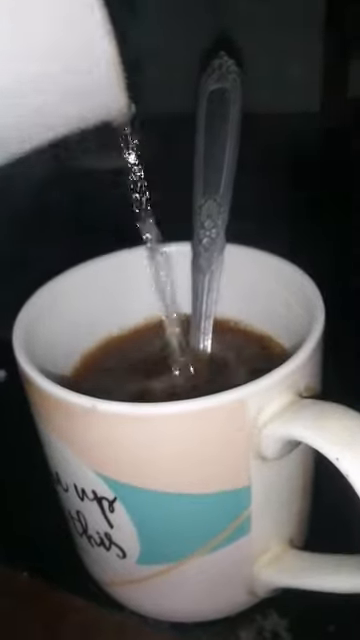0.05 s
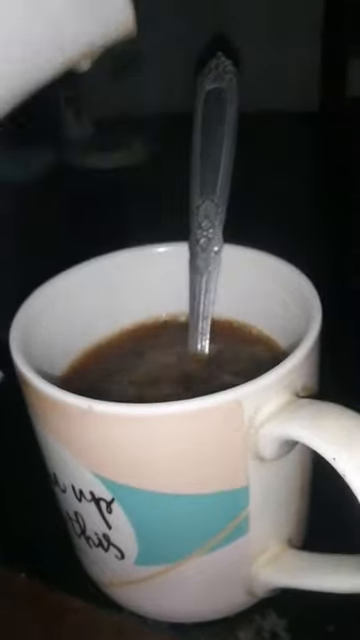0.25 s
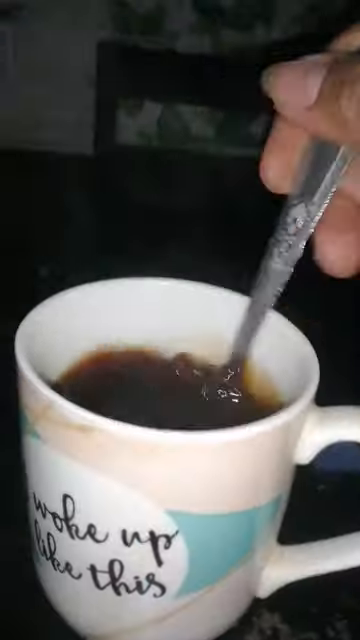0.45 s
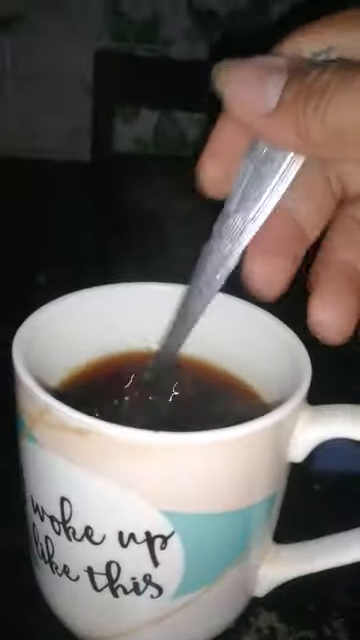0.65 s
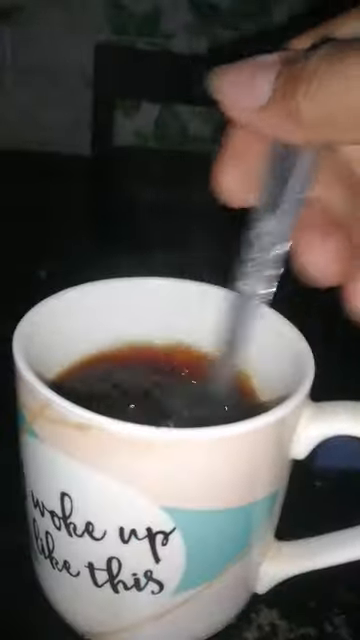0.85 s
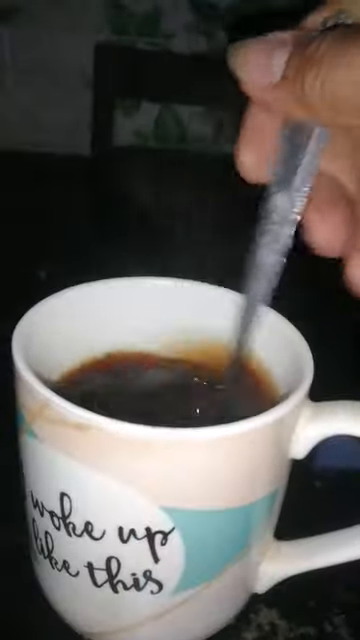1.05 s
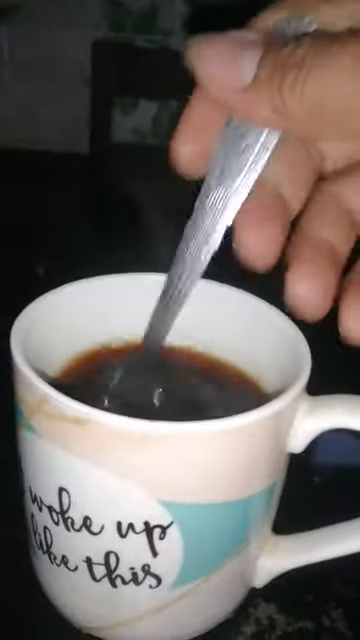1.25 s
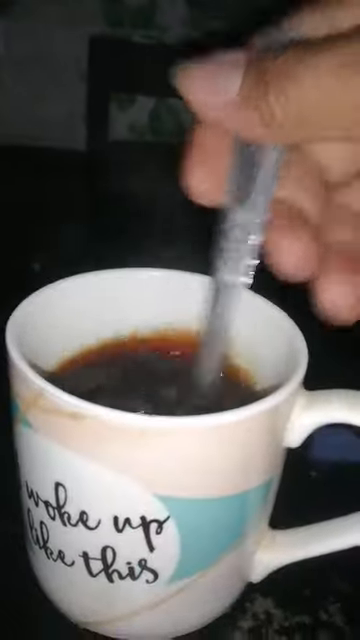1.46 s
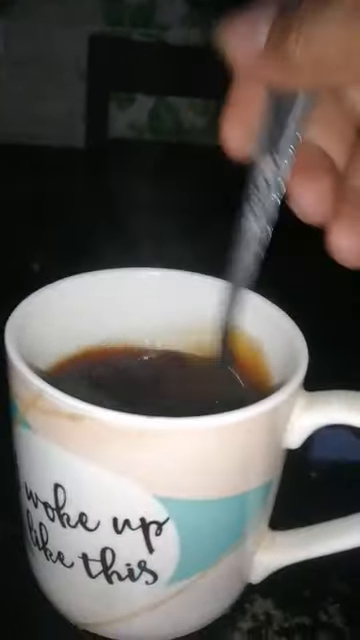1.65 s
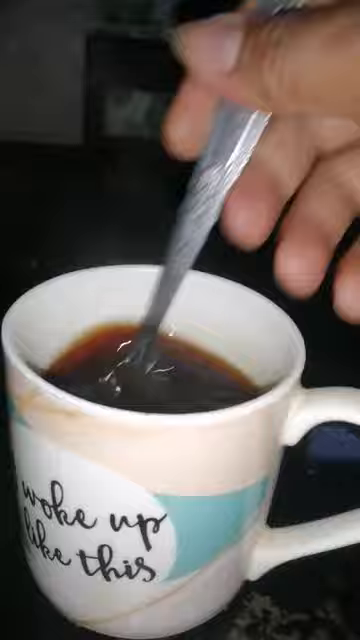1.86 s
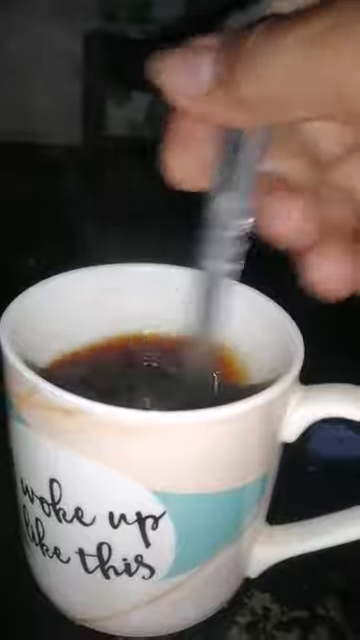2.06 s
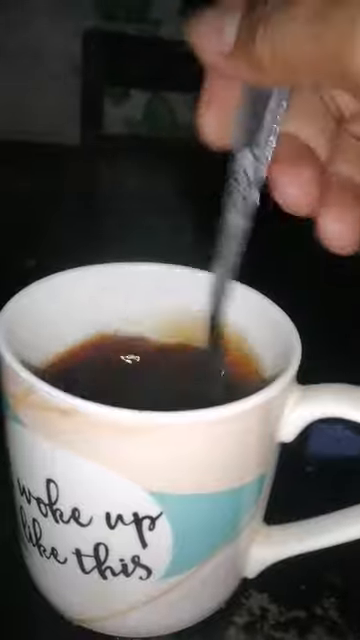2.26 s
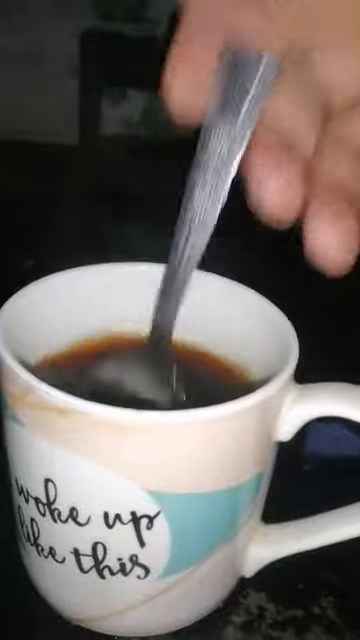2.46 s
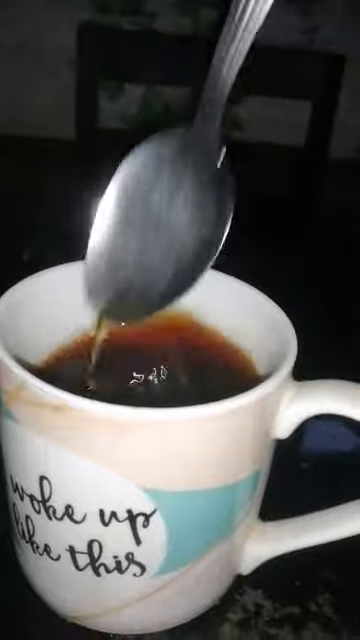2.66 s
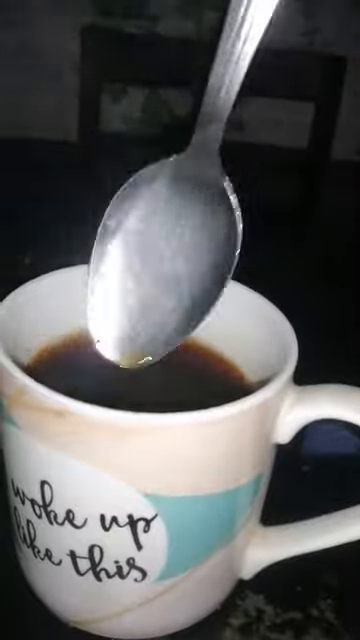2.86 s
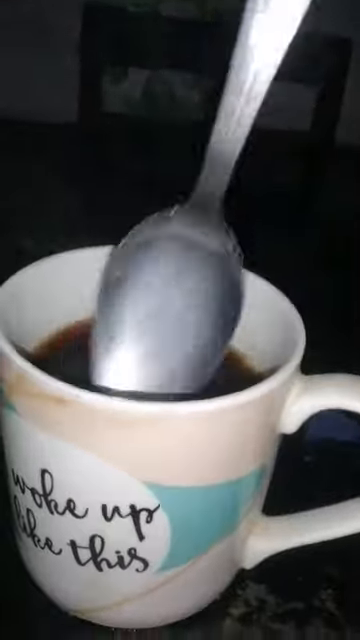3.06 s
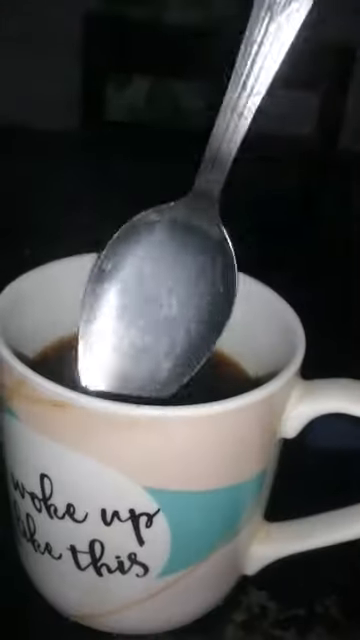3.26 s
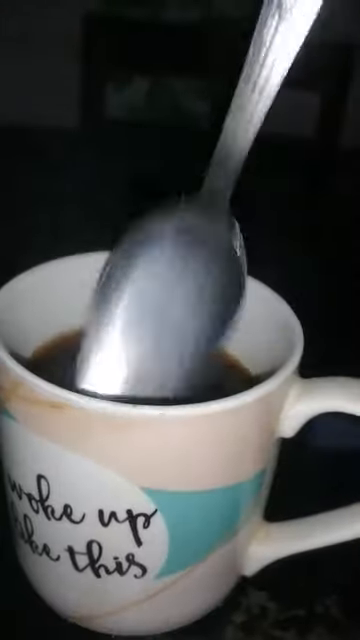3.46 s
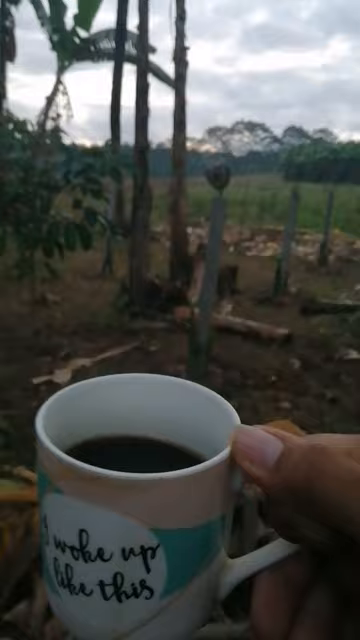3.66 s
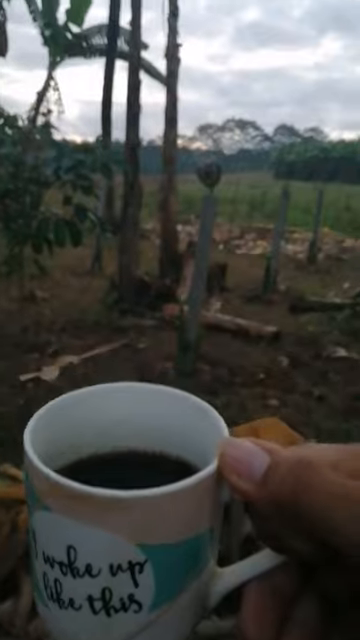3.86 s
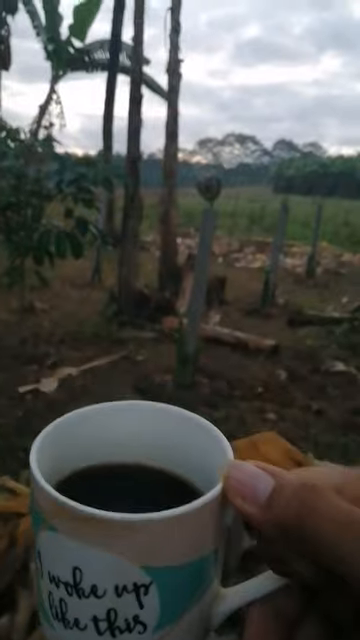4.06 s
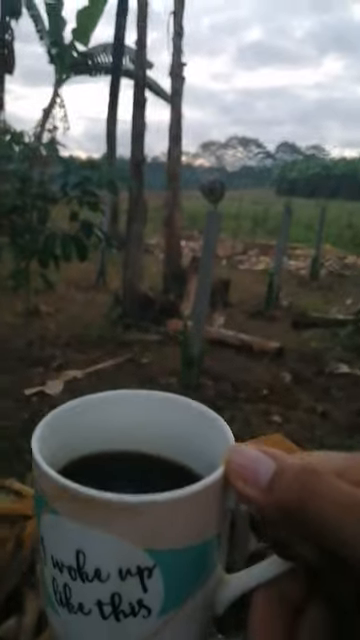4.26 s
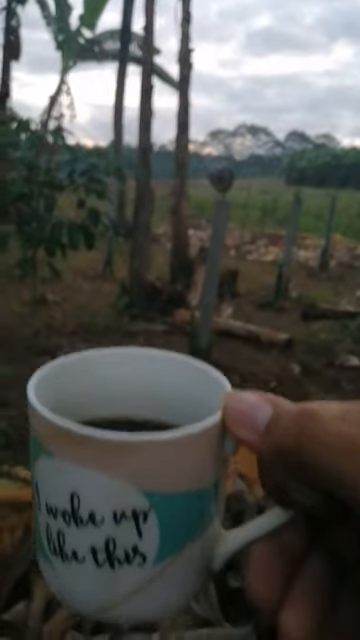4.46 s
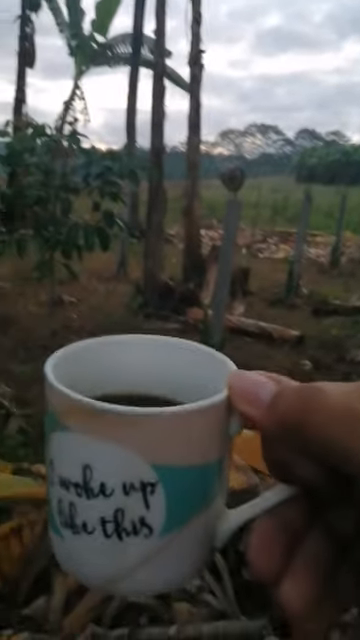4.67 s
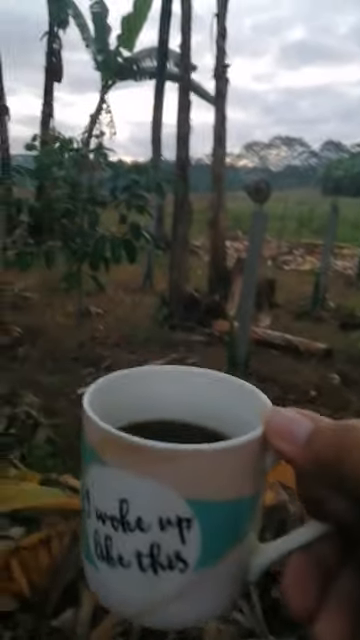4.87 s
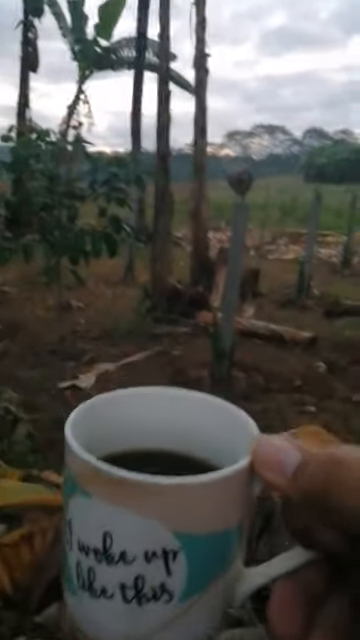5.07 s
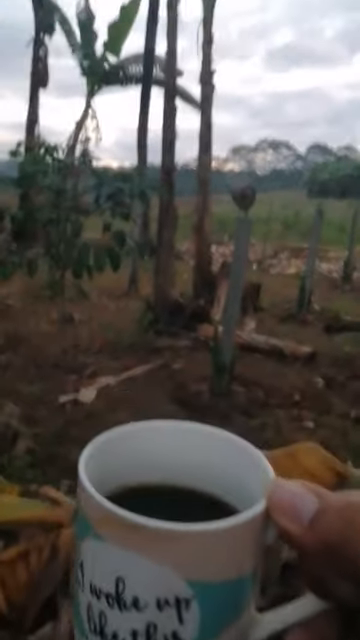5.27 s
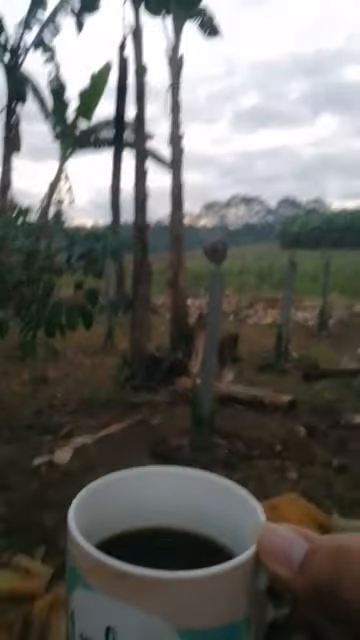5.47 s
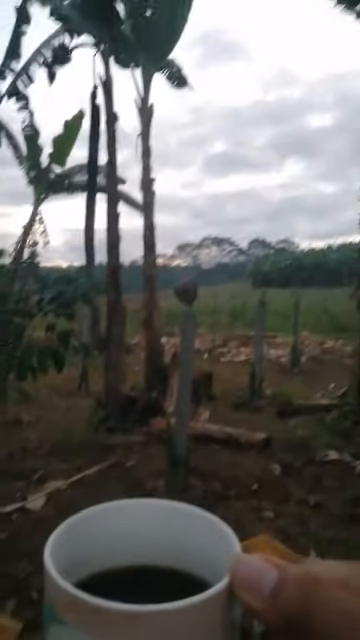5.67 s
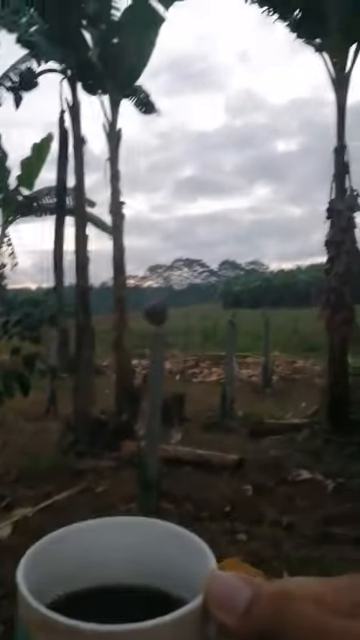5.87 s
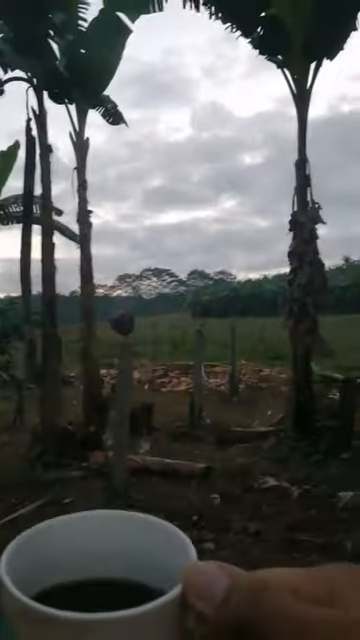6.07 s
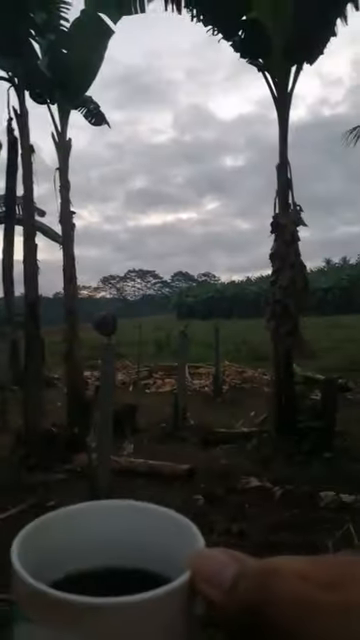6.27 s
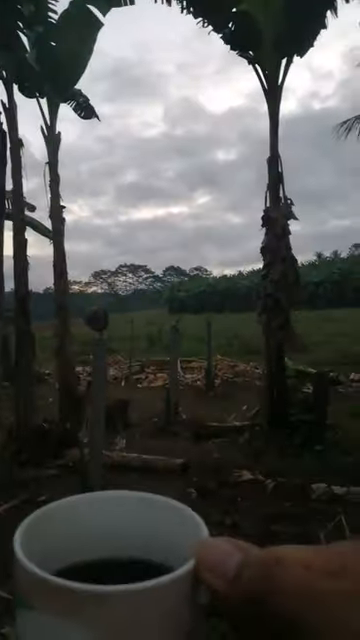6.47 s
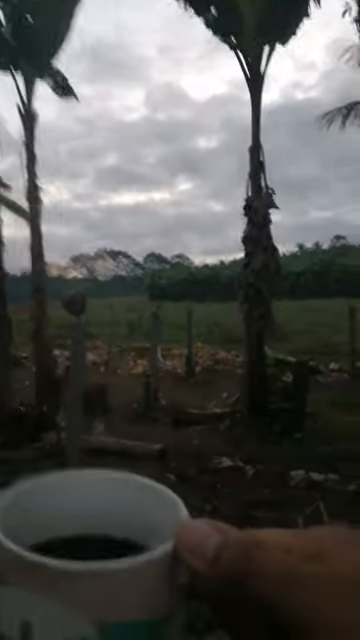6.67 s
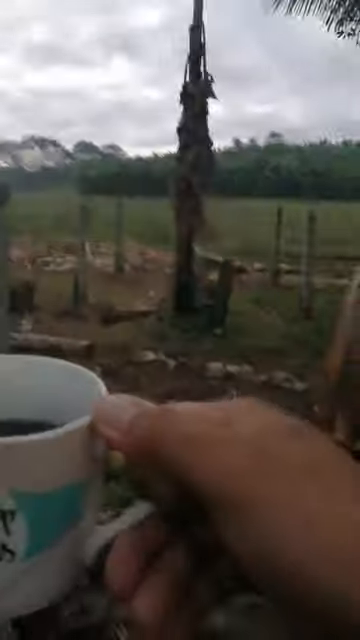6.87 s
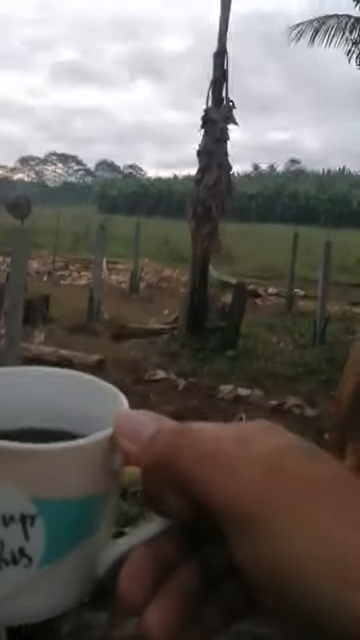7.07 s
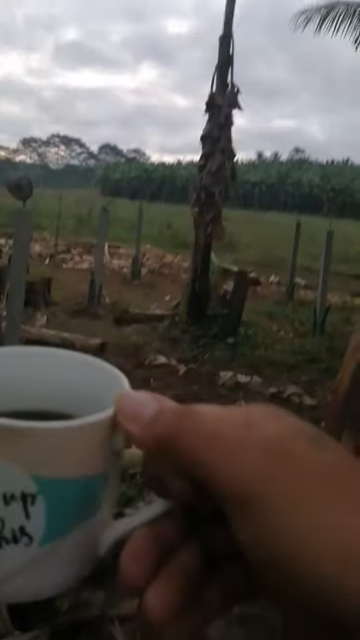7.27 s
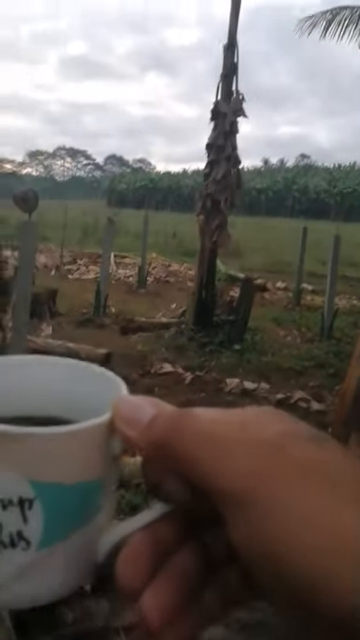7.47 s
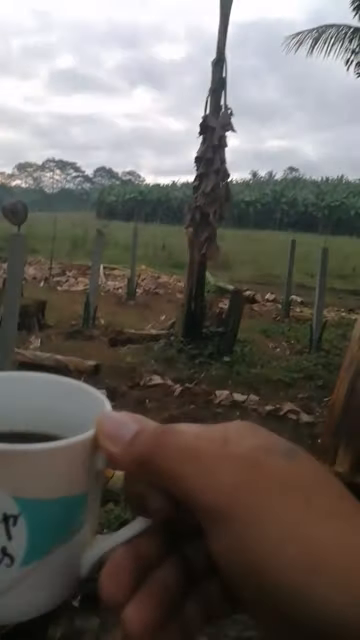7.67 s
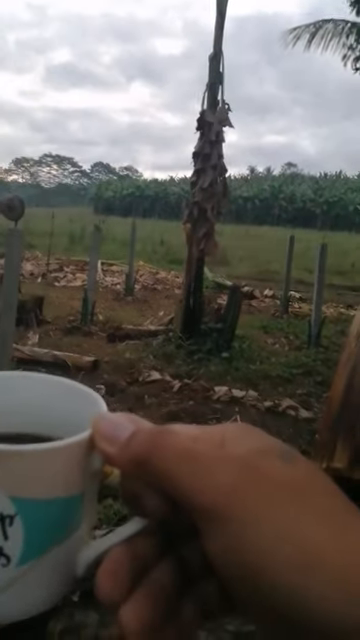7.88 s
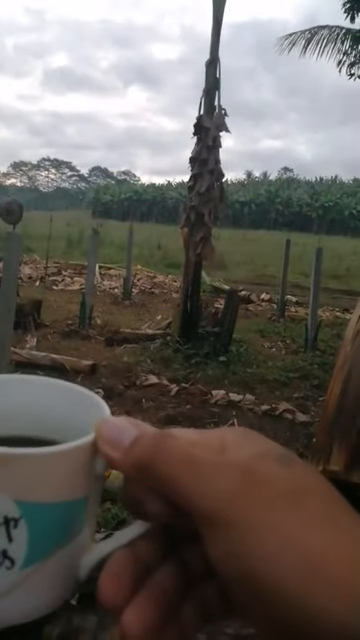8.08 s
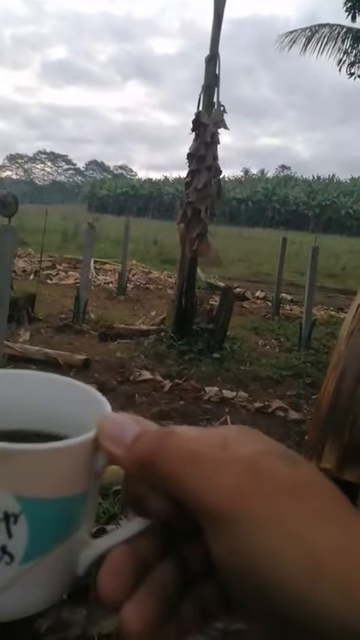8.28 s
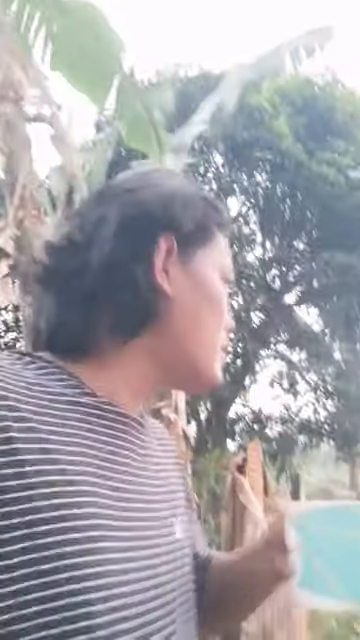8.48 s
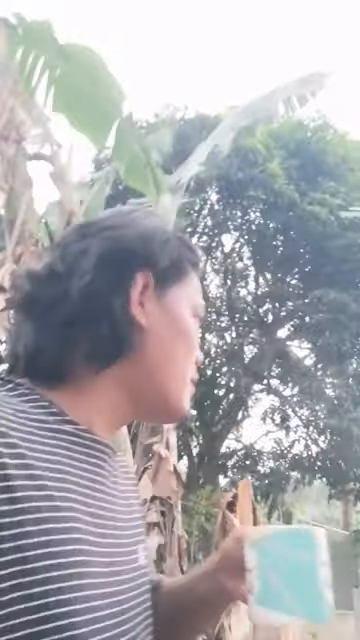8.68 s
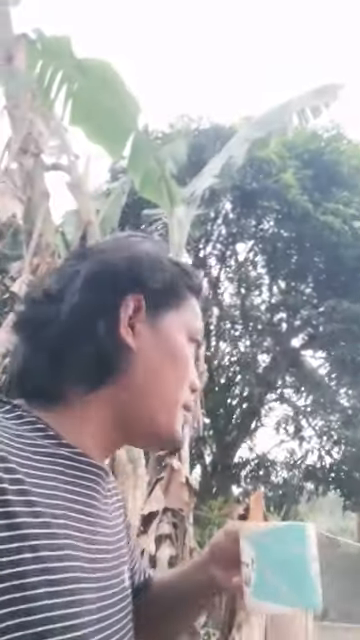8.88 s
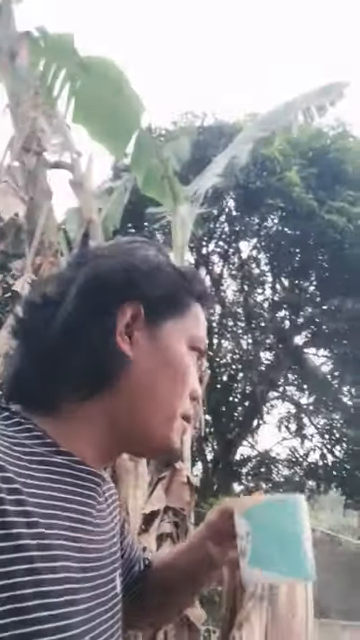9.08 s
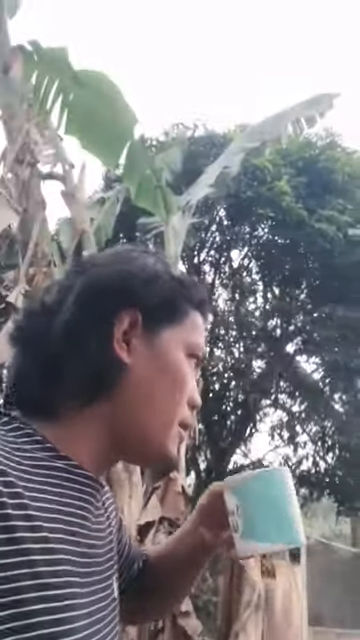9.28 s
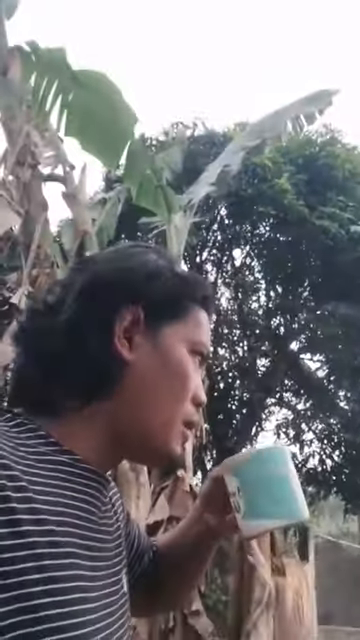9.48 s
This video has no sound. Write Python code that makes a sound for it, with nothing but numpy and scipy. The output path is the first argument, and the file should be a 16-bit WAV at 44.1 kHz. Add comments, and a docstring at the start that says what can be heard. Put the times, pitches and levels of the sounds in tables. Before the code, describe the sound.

In a small hard room, last drops fall into coffee while a cricket pulses faintly. A steel spoon knocks and scrapes irregularly inside a ceramic mug, then strikes the rim three times, loud and slightly overloaded on a close phone microphone. The sound cuts to a much quieter garden with shimmering insects and very distant roosters, then a yard with quick falling chirps and a motorbike slowly approaching.

```python
"""In a small dim kitchen the last water drips into coffee, a steel spoon stirs a ceramic mug and taps its rim
three times while a cricket pulses; a garden then brings dense insects and far roosters, and a yard adds short
falling chirps and a nearing motorbike. Brief silences part the four passages. Contacts are noise bursts plus
decaying modes, sliding is flickering resonant noise and irregular clicks, insects are pulsed bands of noise,
and the calls and exhaust are sums of sines; the hardest taps overload the phone."""
import sys
import numpy as np
from scipy import signal
from scipy.fft import rfft, irfft, next_fast_len
from scipy.io import wavfile

SR = 44100
rng = np.random.default_rng(int(sys.argv[2]) if len(sys.argv) > 2 else 0)


def to_wav(s):
    """Save 16-bit WAV."""
    ch = np.atleast_2d(s).T  # columns
    pcm = np.round(np.clip(ch, -1, 1) * 32767)  # PCM
    wavfile.write(sys.argv[1], SR, pcm.astype(np.int16))


N = 420713
TIME = np.arange(N) / SR

# passages (start [s], end [s])
POURING, STIRRING, GARDEN, YARD = (-.01, .447), (.469, 3.675), (3.696, 8.460), (8.478, 9.6)
# spectrum of the insect chorus (frequency [Hz], left relative level [dB], right relative level [dB])
CHORUS = [(2940, -31, -26), (3884, -31.5, -28), (4400, -14.5, -5), (4920, -10.5, 2), (5550, -15, 3.5),
          (5964, -16, -0.5), (6464, -17.5, -9.5), (7270, -30.5, -24), (7810, -19, -21.5),
          (8580, -6.5, -12.5), (9430, -15.5, -19.5), (9960, -32, -25.5), (11570, -31, -33),
          (15820, -35, -26.5)]


def undb(db):
    """Amplitude gain is ten to the power of decibels over twenty."""
    return 10 ** (np.asarray(db) / 20)


def unit(x):
    """Normalisation: equal mean power, with rms 1."""
    return x / np.sqrt(np.mean(x ** 2))


def curve(rows, axis=1):
    """Linear interpolation in time of one column of a table."""
    return np.interp(TIME, np.array(rows)[:, 0], np.array(rows)[:, axis])


def pan(db):
    """Interaural level difference: gains for left minus right in dB."""
    return undb(np.array([[db], [-db]]) / 2)


def fade(t, t60):
    """Exponential decay: the level falls 60 dB in t60 seconds."""
    return np.exp(-np.log(1000) * t / t60)


def swell(start_s, length_s):
    """Half-sine envelope: a sound that comes and goes."""
    return np.sin(np.pi * np.clip((TIME - start_s) / length_s, 0, 1))


def add(out, s, x):
    """Superposition: mix a short sound in at time s."""
    i = int(s * SR)
    out[:, i:i + x.shape[-1]] += x[..., :max(N - i, 0)]


def colour(x, points):
    """Spectral shaping by (Hz, dB) or (Hz, left dB, right dB) points, keeping the power of white noise."""
    f = np.fft.rfftfreq(x.shape[-1], 1 / SR) + 1
    hz, *ears = np.transpose(points)
    gain = undb([np.interp(np.log(f), np.log(hz), db) for db in ears])
    return irfft(rfft(x) * unit(gain), x.shape[-1])


def noise(points, alike=0.):
    """Partial coherence: coloured stereo noise with the share 'alike' of its power common to both sides."""
    left, right, both = rng.standard_normal((3, next_fast_len(N, True)))
    alike = np.clip(alike, 0, 1)
    mixed = np.sqrt(1 - alike) * np.array([left, right]) + np.sqrt(alike) * both
    return colour(mixed, points)[:, :N]


def band(hz, width_hz, size=N):
    """Resonance: a band-pass selects one region of stereo white noise."""
    edges = np.clip([hz - width_hz / 2, hz + width_hz / 2], 20, SR / 2 - 100)
    sos = signal.butter(3, edges, "band", fs=SR, output="sos")
    return unit(signal.sosfilt(sos, rng.standard_normal((2, size))))


def walk(rate):
    """Random modulation: 'rate' random values a second joined by straight lines, rms 1."""
    steps = rng.standard_normal(4096)
    return unit(np.interp(TIME * rate, np.arange(len(steps)), steps))


def passage(span):
    """Gating: sound starts at once and ends in a 16 ms fade."""
    return (TIME >= span[0]) * np.clip((span[1] - TIME) / 0.016, 0, 1) ** 2


def spoon():
    """Impact and friction: damped knocks with a gritty drag between them, then three hard taps that ring freely."""
    # blows on the inner wall in order of time, and taps on the rim
    # (time [s], level [dB], mug ring [dB], treble [dB])
    stir_blows = [(.4846, -34.5, 6.5, -4.5), (.6074, -30, -13, -23), (.6582, -28, -5, 4),
                  (.753, -14.5, 5, 1), (.8024, -13, -2.5, -10), (.997, -33, 1.5, 2), (1.0364, -18, 6, -5.5),
                  (1.0658, -19, -1, -13), (1.0923, -20.5, 1, -13), (1.1766, -15, -5, 4.5),
                  (1.3427, -21, 3.5, -6), (1.3636, -23, -7, 3), (1.376, -20.5, 3, -15),
                  (1.3906, -20, -10, -1.5), (1.4909, -30, 12, 17.5), (1.5113, -23.5, -7.5, -3),
                  (1.6445, -13.5, 4.5, -6), (1.665, -11.5, -2.5, 0), (1.7567, -13, -2, 7),
                  (1.8994, -20, -4.5, -6), (1.9867, -14.5, 5.5, 6.5), (2.0586, -12.5, -6.5, 7),
                  (2.068, -21.5, -15, 0), (2.2262, -20, -3.5, 2)]
    rim_taps = [(2.9256, -0.5, -6.5, 1), (3.0751, -4.5, -14.5, 1), (3.4603, -2.5, -4.5, 0)]
    # spectrum of the contact crack (frequency [Hz], left relative level [dB], right relative level [dB])
    wall_spectrum = [(149.3, -13, -19), (730, -12.5, -8.5), (1990, -12, -12), (3340, -7.5, -6),
                     (3760, -8, -1.5), (5360, 0, 14), (5860, -14.5, 7.5), (6440, -2, -1.5), (7820, -1, -6),
                     (8800, -2, -13.5), (10780, -5, -12), (12600, -29, -14), (13750, -15, -11),
                     (16400, -25.5, -41.5)]
    rim_spectrum = [(99.8, -23.5, -7.5), (689, -11.5, -7), (3003, -14, -11), (3860, -17, -17.5),
                    (4485, 2.5, 11.5), (5500, -19, 6.5), (6010, -22, 10), (7430, 7, -5.5), (9400, 3, -9.5),
                    (11740, 0, -6.5), (12740, -0.5, -23.5), (13200, -2.5, 0), (14600, -5, -3.5),
                    (16000, -37.5, -23.5)]
    # mug resonances that a dragging spoon wakes (frequency [Hz], width [Hz], relative level [dB])
    drag_bands = [(1450, 350, -3), (1850, 260, -1), (2120, 260, 0), (2450, 300, -4), (5000, 2500, -2)]
    # level of the low swirl of the coffee (time [s], level [dB])
    swirl_levels = [(.47, -50.5), (.8, -89.5), (1.2, -79), (1.7, -67), (2.2, -58.5), (2.5, -75), (2.8, -88)]

    stirs = clinks(stir_blows, wall_spectrum, False, crack_db=-.5, crack_t60=.014, bounce_db=-12,
                   ring_length=.44, detune=.02, scatter_db=2.5)
    taps = clinks(rim_taps, rim_spectrum, True, crack_db=0.5, crack_t60=0.018, bounce_db=0.5)

    # as the contact travels round the wall, now one resonance leads, now another
    wander_db, flicker_db = 4, 3.5
    drag = unit(sum(band(hz, width) * undb(db + wander_db * walk(24.72)) for hz, width, db in drag_bands))
    drag_gain, chatter_gain = sliding()
    drag = drag * drag_gain * undb(flicker_db * walk(150)) * pan(-6)
    # irregular clicks of chatter join the drag, each slide with its own level
    chatter = grit(wall_spectrum, rate_hz=530) * chatter_gain

    swirl_spectrum = [(25, -12.0), (60, -1.5), (250, -6.5), (600, -21.0), (2000, -44.0)]
    swirl = noise(swirl_spectrum, alike=0.95) * undb(curve(swirl_levels) + 2.1 * walk(21)) * pan(-0.42)

    stirring = room(stirs + drag + chatter, wet_db=-8.0, t60=0.21, delay_s=0.0032, treble_db=-6)
    return stirring + swirl + room(taps, wet_db=-16, t60=0.26, delay_s=0.0046, treble_db=-2)


def clinks(blows, crack_points, on_rim, crack_db, crack_t60, bounce_db, ring_length=1, detune=0, scatter_db=0):
    """Modal synthesis: each contact cracks, bounces once and leaves the modes of the solids ringing."""
    # ringing modes of mug, spoon and table
    # (frequency [Hz], free t60 [s], level for wall [dB], level for rim [dB], left minus right [dB])
    mug_spoon_modes = [(1944, .12, -16, -42, -6), (2087, .22, -17, -15, -18), (2406, .13, -27, -50, -12),
                       (4520, .03, -28, -8, -4), (4840, .045, -20, -9, -8), (5465, .16, -20, -23, -12),
                       (5890, .13, -25, -23, -10), (7900, .06, -28, -22, 7), (11422, .12, -38, -12, 5),
                       (13300, .07, -42, -22, 0), (14473, .06, -36, -18, 0)]
    more_mug_spoon_modes = [(752, 0.078, -25, -23.5, 4.5), (1350, 0.092, -26.5, -57.5, 0.5),
                            (2180, 0.25, -43.5, -27, -6), (2980, 0.18, -32, -54, -8),
                            (4147, 0.096, -20, -30, -9.5), (5100, 0.036, -15, -46, -0.5),
                            (10120, 0.027, -30.5, -18.5, 4)]
    table_modes = [(136, 0.53, -53, -42, 5), (595, .15, -52, -45.5, 5.5), (638, 0.14, -44, -32, -4),
                   (840, 0.11, -28.5, -38.5, -9)]
    out, t = np.zeros((2, N)), np.arange(2 ** 14) / SR
    high_pass = signal.butter(1, 8000, "high", fs=SR, output="sos")
    for s, db, ring_db, treble_db in blows:
        for after_s, contact_db in [(0, crack_db), (.003, bounce_db)]:
            burst = crack(crack_points, crack_t60, len(t))
            treble = signal.sosfilt(high_pass, burst)
            add(out, s + after_s, undb(db + contact_db) * (burst + (undb(treble_db) - 1) * treble))
        for hz, t60, wall_db, rim_db, pan_db in mug_spoon_modes + more_mug_spoon_modes + table_modes:
            # low modes depend on where the mug is struck; the highest need a hard contact
            mode_db = (rim_db if on_rim else wall_db) + ring_db * (hz < 3000) + treble_db * (hz > 7000)
            mode_db += scatter_db * rng.standard_normal()
            # sloshing coffee and the grip on the spoon shift each mode from blow to blow
            mode_hz = hz * (1 + detune * rng.standard_normal())
            phase = 2 * np.pi * (mode_hz * t + rng.random((2, 1)) / 2)
            build_up = 1 - np.exp(-t * hz / 4)
            ring = np.sin(phase) * fade(t, t60 * ring_length) * build_up
            add(out, s, undb(db + mode_db) * pan(pan_db) * ring)
    return out


def crack(points, t60, size):
    """Broadband impulse: a burst of noise that dies in milliseconds, with the colour of the contact."""
    lead = size // 8  # silence ahead of the burst keeps the filter from wrapping round
    burst = rng.standard_normal((2, size)) * fade(np.arange(size) / SR, t60)
    return colour(np.pad(burst, ((0, 0), (lead, 0))), points)[:, lead:]


def sliding():
    """Contact pressure: gains of drag and chatter as each slide bites quickly, holds and lets go."""
    # after a knock the spoon slides along the wall (start [s], hold [s], drag [dB], chatter [dB])
    wall_slides = [(0.503, 0.06, -51.5, -56), (.81, 0.055, -54.5, -52), (1.064, 0.02, -42.5, -44),
                   (1.366, 0.021, -45, -45), (1.668, 0.0083, -43, -45), (1.771, .01, -49, -35),
                   (1.901, 0.027, -55, -44), (2.081, .012, -54, -46)]
    attack_s, t60_s = .012, 0.18
    # between slides the spoon keeps brushing the mug until it is lifted
    light_drag_db, lift_s = -67.5, 2.2
    drag = undb(light_drag_db) * np.clip((lift_s - TIME) / t60_s, 0, 1)
    chatter = 0
    for s, hold_s, drag_db, chatter_db in wall_slides:
        bite = np.clip((TIME - s) / attack_s + 1, 0, 1) ** 2
        press = bite * fade(np.maximum(TIME - s - hold_s, 0), t60_s)
        drag = drag + undb(drag_db) * press
        chatter = chatter + undb(chatter_db) * press
    return drag, chatter


def grit(points, rate_hz):
    """Stick and slip: irregular tiny clicks of uneven size."""
    slips = (rng.random(N) < rate_hz / SR) * rng.standard_normal(N)
    padded = np.pad([slips, slips], ((0, 0), (0, next_fast_len(N, True) - N)))
    return unit(colour(padded, points)[:, :N])


def room(x, wet_db, t60, delay_s, treble_db):
    """Reverberation of a small hard room: a diffuse tail that builds up within milliseconds."""
    t = np.arange(2 ** 15) / SR
    tail = rng.standard_normal((2, len(t))) * fade(t, t60) * (1 - np.exp(-(t / delay_s) ** 2))
    spectrum = [(300, 7), (1300, 2.5), (2100, 2), (3200, 2.5), (6000, -8), (12000, treble_db)]
    tail = colour(unit(tail), spectrum) / np.sqrt(len(t))
    return x + undb(wet_db) * signal.fftconvolve(x, tail, axes=1)[:, :N]


def drops_and_ticks():
    """Bubble resonance and damped noise: drops ring with rising pitch; ticks die in about two dozen cycles."""
    # drips and plops of the coffee (time [s], starting pitch [Hz], level [dB])
    drop_rows = [(.009, 1900, -54), (0.05, 1390, -48), (.058, 706, -46.5), (2.423, 328, -50),
                 (2.458, 328, -55), (3.23, 646, -49)]
    # splashes and ticks of handling (time [s], centre [Hz], width [Hz], level [dB], left minus right [dB])
    tick_rows = [(.009, 7100, 7500, -28, 0), (0.02, 925, 935, -42.5, -8), (.051, 7450, 7500, -28.5, 3),
                 (.056, 690, 690, -41.5, -9), (0.118, 8940, 8000, -32, 1), (1.3005, 6000, 6000, -37, 0),
                 (2.6242, 2430, 600, -33.5, -4), (3.703, 760, 760, -51, -7), (4.095, 1090, 700, -53, -10),
                 (4.854, 1950, 3060, -49.5, -16), (5.635, 5900, 4430, -19.5, -20),
                 (6.869, 1620, 800, -53, -6.5)]
    out, t = np.zeros((2, N)), np.arange(4096) / SR
    for s, hz, db in drop_rows:
        bubble = np.sin(2 * np.pi * hz * t * (1 + 1.4 * t)) * fade(t, 30 / hz)
        add(out, s, undb(db) * bubble)
    for s, hz, width_hz, db, pan_db in tick_rows:
        settled = band(hz, width_hz, size=8192)[:, -len(t):]  # past the filter's onset
        tick = settled * fade(t, 24 / hz) * (1 - np.exp(-t * hz))
        add(out, s, undb(db) * pan(pan_db) * tick)
    return out


def motorbike():
    """Harmonic series of the firing rate: far exhaust grows as it nears, road noise rises more slowly."""
    # approach (time [s], mean firing rate [Hz], exhaust level [dB])
    approach = [(8.48, 53.1, -60), (8.7, 53, -57), (8.9, 54.07, -53.5), (9.2, 53.8, -50.5),
                (9.54, 54.8, -44.5)]
    # exhaust harmonics (multiple of firing rate [1], relative level [dB])
    orders = [(1, -8), (2, 1), (3, -0.5), (4, -2), (5, -10), (6, -13)]
    # road spectrum (frequency [Hz], relative level [dB per Hz])
    road_spectrum = [(18, -43), (30, -24), (75, -20), (103, -4), (186, -11.5), (214, -9), (355, -18),
                     (481, -17), (3800, -25.5), (4940, -15), (8360, -120)]
    turns = np.cumsum(curve(approach) * (1 + 0.0048 * walk(25))) / SR
    db = curve(approach, axis=2)
    exhaust = sum(undb(order_db + 1.5 * walk(10)) * np.sin(2 * np.pi * (round(k) * turns + rng.random()))
                  for k, order_db in orders)
    road = noise(road_spectrum, alike=0.36) * pan(-6) * undb(0.58 * db - 27.0)
    return unit(exhaust) * undb(db) * pan(-2.5) + road


def chirps():
    """Frequency glide: a small caller slides quickly down, in threes, about four groups a second."""
    # groups of chirps (start [s], level [dB])
    groups = [(8.469, -55.5), (8.724, -50.5), (8.98, -50.5), (9.234, -52), (9.484, -53.5)]
    # first, second and third chirp of a group (relative level [dB])
    accents_db = [-1.5, 2, 0.5]
    length_s, gap_s = 0.0291, .0367
    out, t = np.zeros((2, N)), np.linspace(0, 1, int(length_s * SR))
    for s, db in groups:
        for k, accent_db in enumerate(accents_db):
            hz = 5100 + (4330 - 5100) * t + 40 * rng.standard_normal()
            call = np.sin(np.pi * t) * np.sin(2 * np.pi * np.cumsum(hz) / SR)
            add(out, s + k * gap_s, undb(db + accent_db) * pan(-25) * call)
    return out


def roosters():
    """Harmonic partials on an arched pitch, each blurred by the trees; only harmonics two to four carry."""
    # far calls (start [s], length [s], nominal pitch [Hz], level [dB], step from partial to partial [dB])
    crows = [(4.522, 0.3, 462, -74.5, -18.5), (6.95, 0.67, 446, -81, -28), (7.831, 0.148, 525, -69, -8),
             (8.03, 0.47, 490, -72, 1)]
    out = np.zeros((2, N))
    for s, length, hz, db, step_db in crows:
        arch = np.sin(np.linspace(0, np.pi, int(length * SR)))
        phase = 2 * np.pi * np.cumsum(hz * (.92 + .1 * arch)) / SR
        partials = 0
        for k in range(3):
            blur = .6 + .7 * walk(110)[:len(arch)]
            partials = partials + undb(step_db * k) * np.sin((k + 2) * phase) * blur
        add(out, s, undb(db) * pan(-10.5) * np.sqrt(arch) * partials)
    return out


def insects():
    """Amplitude-modulated noise: a fluttering wide chorus, waves of lower crickets and two nearer callers."""
    # bouts of a clear-toned cricket (start [s], length [s], level [dB])
    clear_bouts = [(4.21, 1, -57.5), (5.7, .7, -57), (7.1, 1, -56.5)]
    chorus = noise(CHORUS) * undb(-48.5 + 0.67 * walk(35) + 0.55 * walk(250))
    # lower-voiced crickets call in even waves
    first_s, period_s, wave_db, flutter_db = 3.89, .263, -58, 1.5
    waves = np.abs(np.sin(np.pi * (TIME - first_s) / period_s))
    low = band(4840, 740) * pan(-11) * waves * undb(wave_db + flutter_db * walk(74)) * passage(GARDEN)
    pulse_hz = 10.3
    bouts = sum(undb(db) * swell(s, length) for s, length, db in clear_bouts)
    clear = band(5350, 150) * pan(-21) * bouts * np.sin(np.pi * pulse_hz * TIME) ** 2
    return chorus + low + clear + cricket(6520, first_s=3.0, period_s=.139, db=-64.5)


def cricket(hz, first_s, period_s, db):
    """Periodic stridulation: even rasps of narrow-band noise, one in each period."""
    cycle = (TIME - first_s) / period_s % 1
    burst = np.sin(np.pi * np.minimum(cycle / .62, 1)) ** 2
    return undb(db) * np.sqrt(burst) * band(hz, 330) * pan(-9.5)


def whistles():
    """Phase modulation: two short, slightly wavering, far-off whistles."""
    # faint thin tones (start [s], length [s], frequency [Hz], level [dB])
    thin_tones = [(0.922, 0.071, 3770, -64), (2.386, 0.17, 4060, -63.5)]
    out = np.zeros((2, N))
    for s, length, hz, db in thin_tones:
        t = np.arange(int(length * SR)) / SR
        tone = np.sin(np.pi * t / length) * np.sin(2 * np.pi * hz * t + walk(120)[:len(t)])
        add(out, s, undb(db) * pan(-15) * tone)
    return out


def kitchen():
    """Ambient superposition: room tone, insects through the wall, a cricket, and a hum during the pour."""
    # room tone (frequency [Hz], relative level [dB per Hz])
    tone_spectrum = [(18, -48), (30, -10.5), (131, -5), (295, -8), (461, -22), (554, -20), (702, -22.5),
                     (759, -24.5), (4410, -31), (6540, -19), (7860, -35), (12600, -33), (16000, -43)]
    # hum (frequency [Hz], level [dB])
    hum_lines = [(75.4, -56), (194, -68), (231.5, -80), (269, -65.5)]
    tone = undb(-60) * noise(tone_spectrum, alike=0.63) * pan(-3.5) + undb(-59.0) * noise(CHORUS)
    hum = sum(undb(db) * np.sqrt(2) * np.sin(2 * np.pi * (hz * TIME + 0.065 * walk(7.6)))
              for hz, db in hum_lines)
    pouring = tone + hum * pan(-2.5) + cricket(6460, first_s=-0.022, period_s=0.126, db=-57)
    stirring = tone + whistles() + cricket(6620, first_s=0.469, period_s=.1376, db=-53.5)
    return pouring * passage(POURING) + stirring * passage(STIRRING)


def open_air():
    """Broadband noise, mostly low and coherent between the sides, wandering gently in level."""
    # spectrum of the air (frequency [Hz], relative level [dB per Hz])
    air_spectrum = [(15, -62), (25, 8), (43, 3), (217, -3), (566, -14), (913, -11.5), (1300, -18),
                    (1810, -11), (3600, -52), (4680, -85), (7920, -120)]
    return undb(-68.5) * noise(air_spectrum, alike=0.77) * pan(-4.0) * undb(walk(6.4))


def scene():
    """Superposition of gated sources: kitchen, garden and yard in turn."""
    outdoors = insects() + open_air()
    garden = (outdoors + roosters()) * passage(GARDEN)
    yard = (outdoors + chirps() + motorbike()) * passage(YARD)
    return kitchen() + spoon() * passage(STIRRING) + drops_and_ticks() + garden + yard


def record(dry):
    """Hard clipping and band limiting: the phone overloads on the hardest taps and cuts the top."""
    top_hz = 15700
    clipped = np.clip(dry, -.9, .9)
    return signal.sosfilt(signal.ellip(8, .2, 70, top_hz, fs=SR, output="sos"), clipped)


dry = scene()
out = record(dry)
to_wav(out)
```